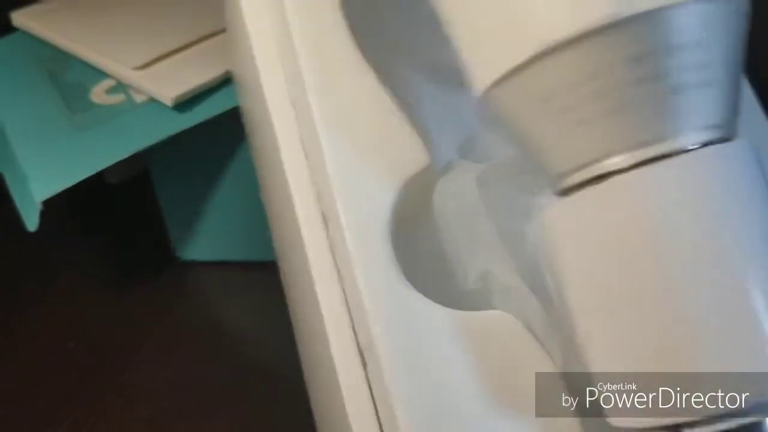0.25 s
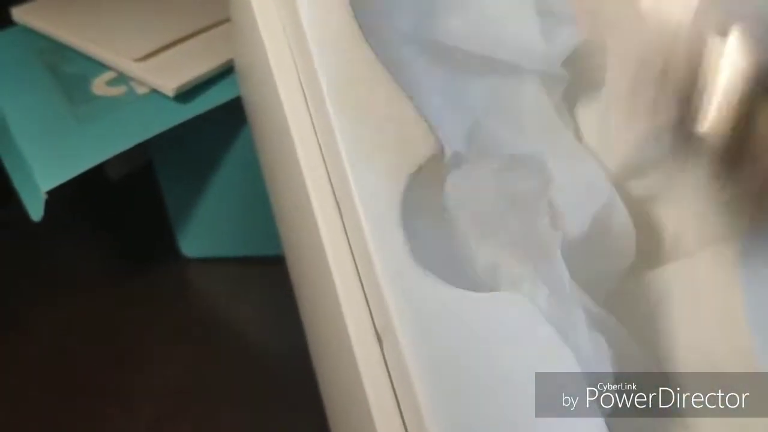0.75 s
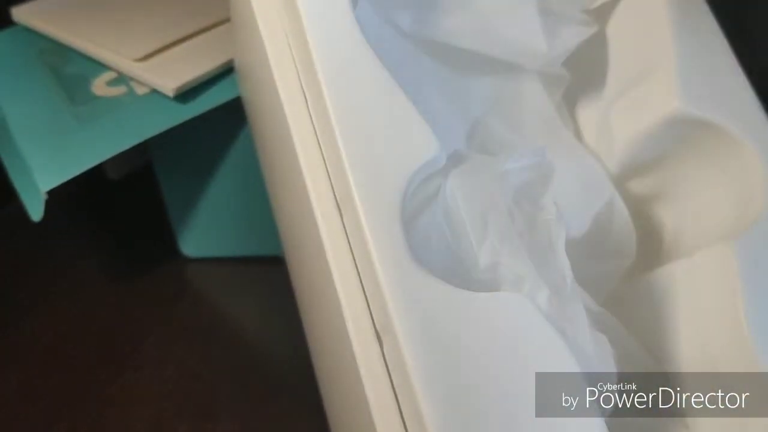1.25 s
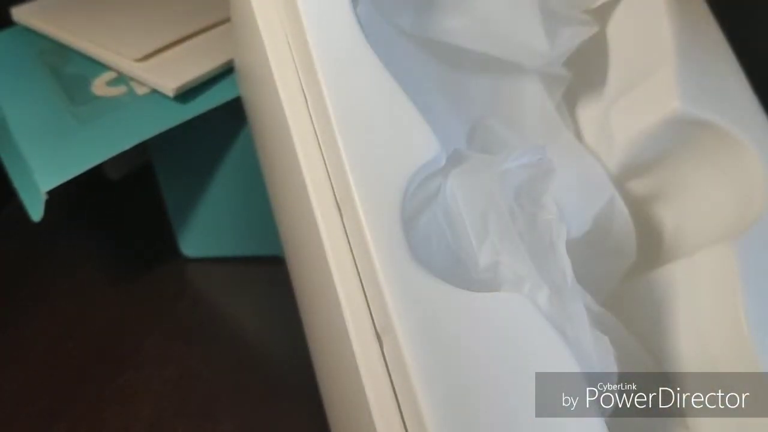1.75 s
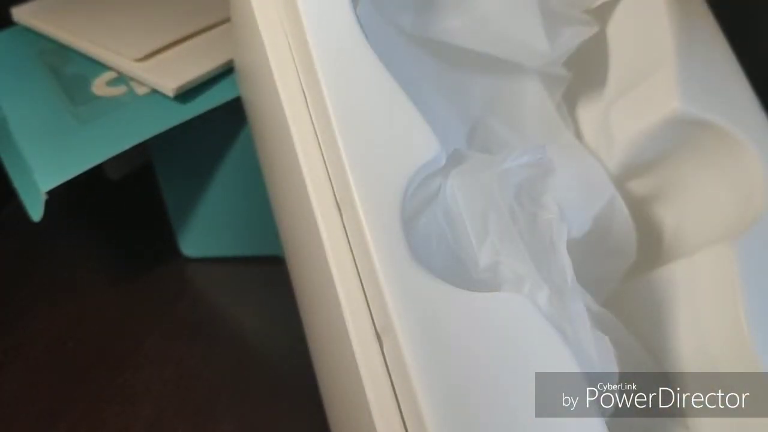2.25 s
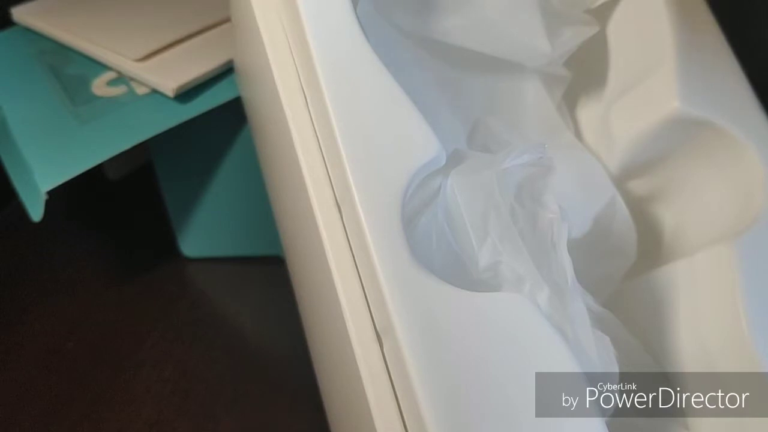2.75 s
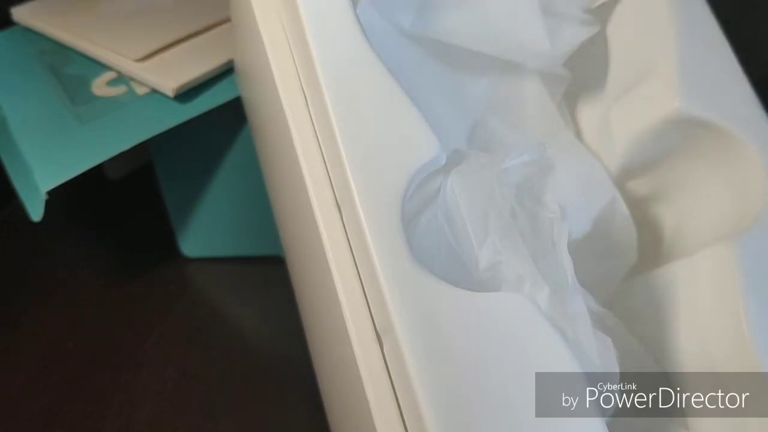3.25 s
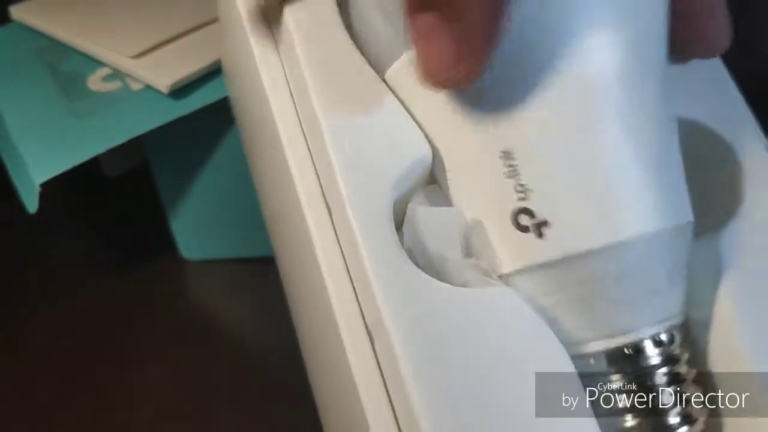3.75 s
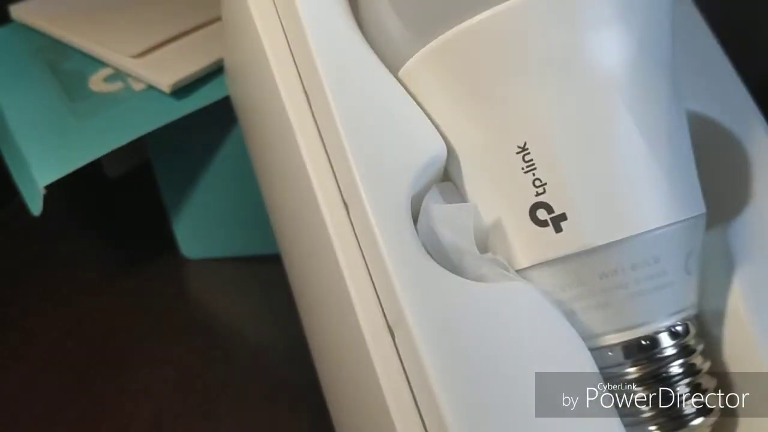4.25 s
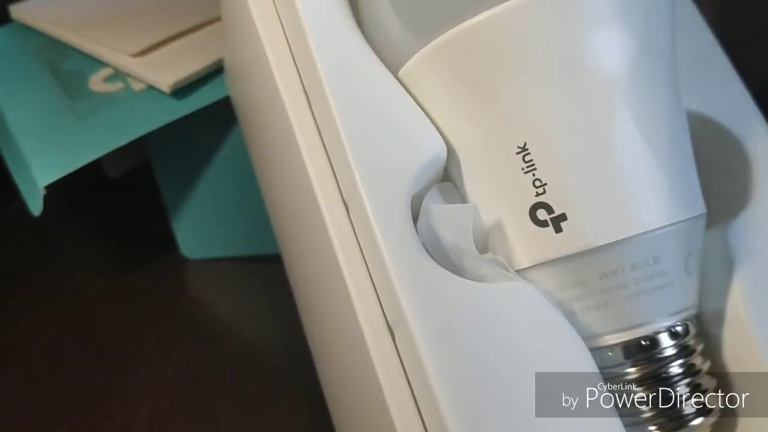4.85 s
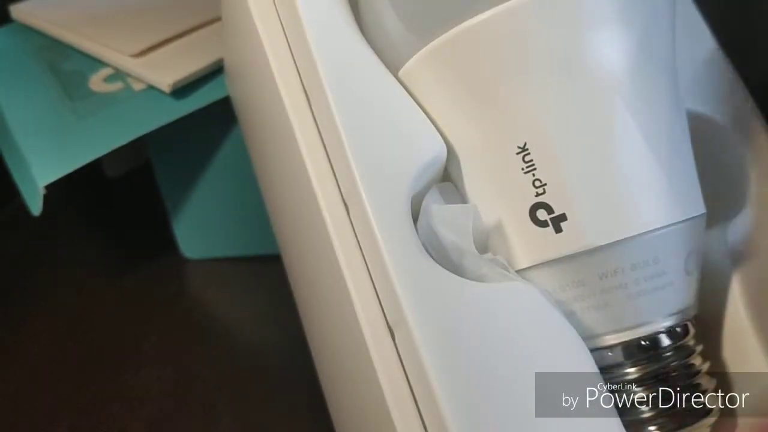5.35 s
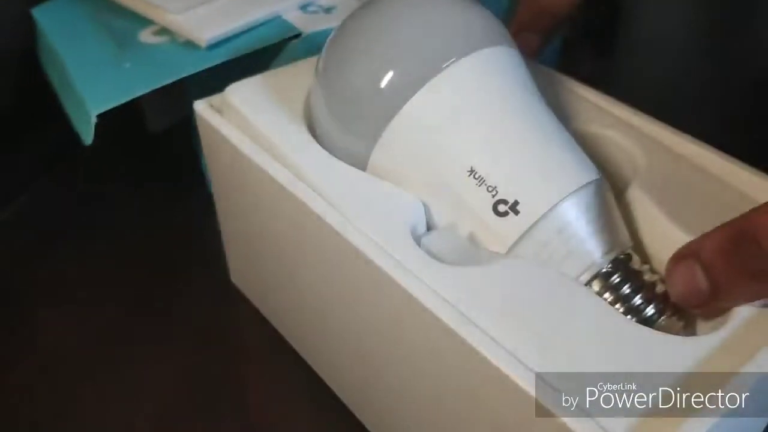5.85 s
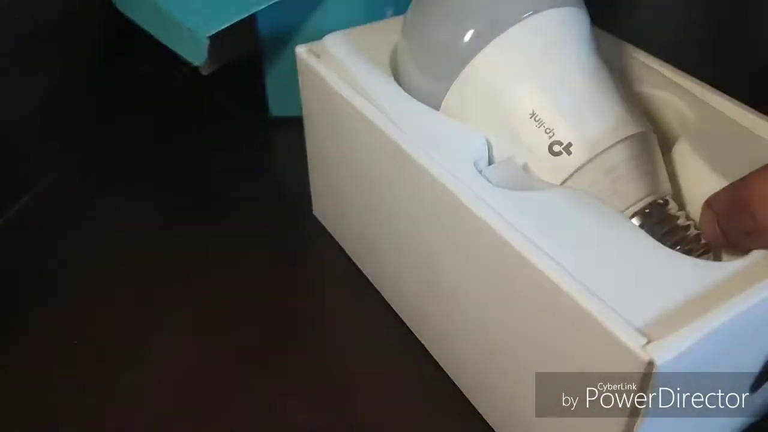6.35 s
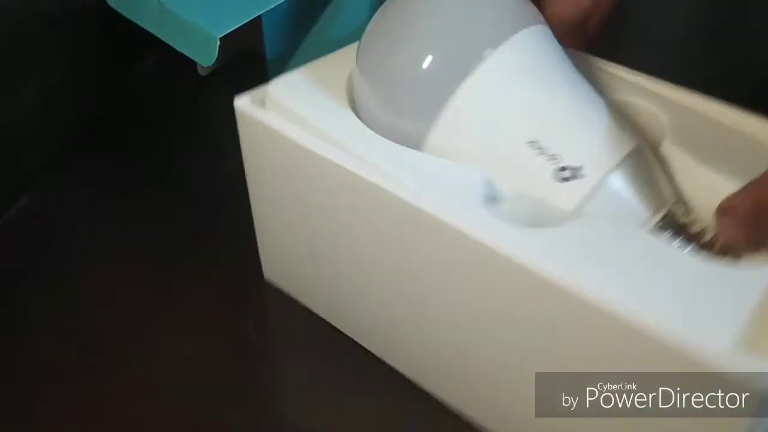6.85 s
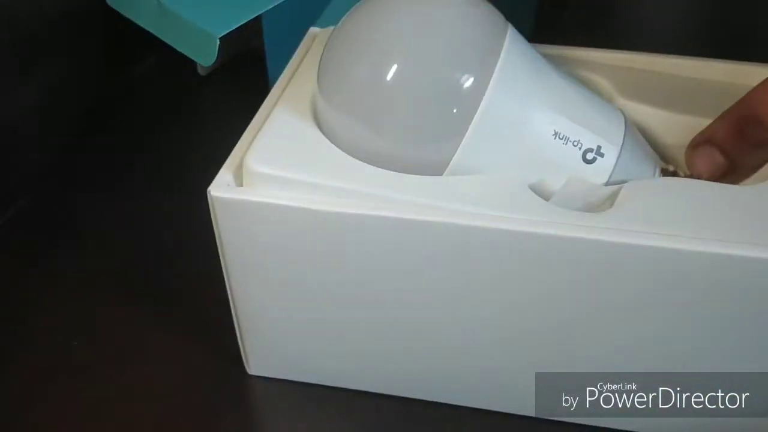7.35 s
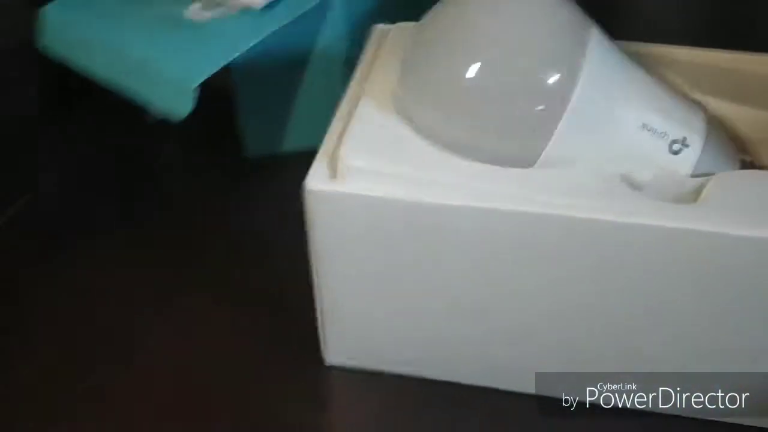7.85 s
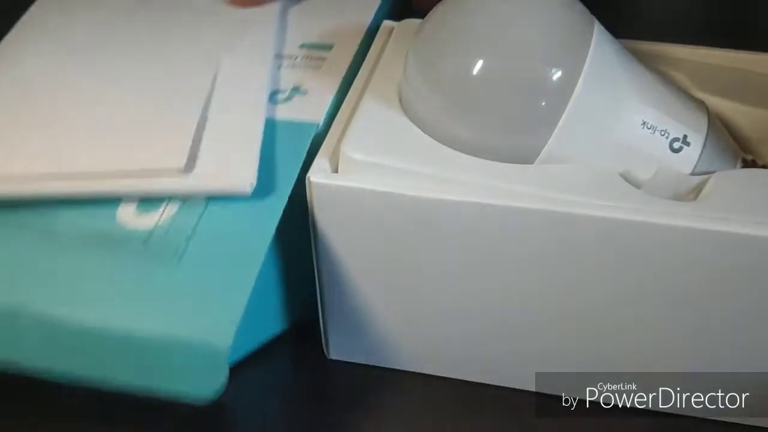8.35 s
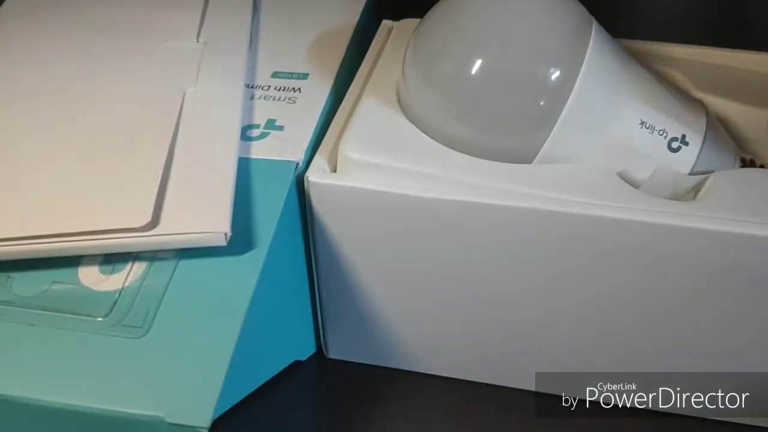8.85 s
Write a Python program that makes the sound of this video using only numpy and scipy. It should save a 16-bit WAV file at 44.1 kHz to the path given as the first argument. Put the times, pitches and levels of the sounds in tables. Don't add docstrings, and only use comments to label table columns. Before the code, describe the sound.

Over a steady fan hum with low buffeting, hard card knocks give way to crisp tissue brushing, one loud clack, then box thump and sliding rubs.

```python
import sys
import numpy as np
from scipy import signal
from scipy.fft import rfft, irfft, next_fast_len
from scipy.io import wavfile

SR = 44100
rng = np.random.default_rng(int(sys.argv[2]) if len(sys.argv) > 2 else 0)


def level_to_linear(level):
    exponent = np.asarray(level, float) / 20
    return 10 ** exponent


def generate_wav(signal):
    frames = np.transpose(np.atleast_2d(signal))
    scaled = np.clip(frames, -1, 1) * 32767
    pcm = np.round(scaled).astype(np.int16)
    wavfile.write(sys.argv[1], SR, pcm)


N = 401298


def at_hz(points, hz):
    table_hz, value = np.array(points).T
    return np.interp(np.log(hz), np.log(table_hz), value)


def bins_hz(size):
    return np.maximum(np.arange(size // 2 + 1) * SR / size, 5)


def rms_one(x):
    return x / np.sqrt(np.mean(x ** 2) + 1e-20)


def drift(rate_hz):
    r = np.exp(-80 * np.pi * rate_hz / SR)
    white = rng.standard_normal(N // 40 + 2002)
    slow = signal.lfilter([1], [1, -2 * r, r * r], white)[2000:]
    return np.interp(np.arange(N) / 40, np.arange(len(slow)), rms_one(slow))


def coloured(x, spectrum):
    size = next_fast_len(N)
    gain = level_to_linear(at_hz(spectrum, bins_hz(size)))
    return irfft(rfft(x, size) * rms_one(gain), size)[..., :N]


def shared(mid, side, alike):
    return np.sqrt(1 + alike) * mid + np.sqrt(1 - alike) * side * [[1], [-1]]


def pair(alike):
    mid, side = rng.standard_normal((2, N))
    return shared(mid, side, alike) / np.sqrt(2)


def filtered(x, order, hz, kind):
    return signal.sosfilt(signal.butter(order, hz, kind, fs=SR, output="sos"), x)


def panned(db):
    return level_to_linear(np.array([db / 2, -db / 2]))


def ring(clicks, hz, t60_s):
    r, w = level_to_linear(-60 / (t60_s * SR)), 2 * np.pi * hz / SR
    return signal.lfilter([0, np.sin(w)], [1, -2 * r * np.cos(w), r * r], clicks + 1e-18)


def swells(s, db, rise_s, fade_s, span_db, power, rest_db):
    t = np.arange(0, N + 32, 32) / SR - s[:, None]
    away = np.where(t < 0, -t / np.abs(rise_s[:, None]), t / np.abs(fade_s[:, None]))
    swell_db = db[:, None] - span_db * np.minimum(away ** power, 9)
    power_sum = level_to_linear(2 * swell_db).sum(0) + level_to_linear(2 * rest_db)
    return np.interp(np.arange(N) / 32, np.arange(t.shape[1]), 10 * np.log10(power_sum))


def late_left(x, samples):
    return np.array([np.roll(x[0], samples), x[1]])


# frequency in Hz, level in dB per Hz.
FAN_SPECTRUM = [(30, 3.5), (100, -4.5), (250, -0.5), (450, -6.5), (730, -11), (1100, -4.5), (1350, -9),
                (1600, -14), (2500, -14.5), (4000, -22), (8000, -32), (16000, -41)]
# frequency in Hz, likeness 0-1.
FAN_LIKENESS = [(60, 0.64), (130, 1), (300, 0.75), (650, 0.54), (1400, 0.017), (16000, .01)]
AIR_DB, HUM_HZ, HUM_WIDTH_HZ, HUM_DB = -48.5, 333, 4.1, -58.5


def room_air():
    size = next_fast_len(N)
    alike = np.clip(at_hz(FAN_LIKENESS, bins_hz(size)), 0, 1)
    mid, side = rfft(rng.standard_normal((2, size)))
    white = irfft(shared(mid, side, alike), size)[:, :N]
    hum = rms_one(ring(rng.standard_normal(N), HUM_HZ, 2.7 / HUM_WIDTH_HZ))
    hum = hum + 1.3 * np.sin(2 * np.pi * HUM_HZ * np.cumsum(1 + .004 * drift(2)) / SR)
    air = level_to_linear(AIR_DB + 0.47 * drift(3.4)) * coloured(white, FAN_SPECTRUM)
    return air + level_to_linear(HUM_DB) * hum * panned(-4.5)[:, None]


# fullest in seconds, level in dB, half length in seconds, left-right in dB.
PORT_GUSTS = [(0.05, -38.5, .3, 6), (0.402, -41, .15, 13), (0.578, -35.5, 0.19, -7), (0.78, -43, 0.28, 13),
              (0.98, -34, .09, 2.5), (1.291, -32.5, 0.19, 10), (1.402, -33.5, 0.11, 13),
              (1.54, -40, .28, -8), (1.96, -40, 0.31, -3), (2.253, -39, .12, 18), (2.34, -33.5, .15, -7.5),
              (2.592, -39, 0.24, 12), (2.73, -43, 0.17, -12), (2.921, -38.5, .15, 19.5),
              (3.07, -32, 0.15, -6.5), (3.527, -40.5, .1, 13), (3.771, -34.5, 0.26, -4),
              (4.06, -40.5, 0.31, -5), (4.47, -40.5, 0.17, 10), (5.6, -40, 0.21, 5), (5.95, -42, 0.33, 1),
              (6.356, -37.5, .15, 11.5), (6.517, -40.5, .3, -3.5), (6.802, -46, 0.48, 7.5),
              (7.55, -35, 0.29, -4.5), (8.015, -46, .33, 0.5), (8.29, -47, .1, 13),
              (8.446, -32.5, .15, -2.5), (8.642, -33.5, 0.21, 3), (8.93, -33.5, 0.45, 11.5)]
GUST_SPAN_DB, GUST_ROUND, LULL_DB = 20, 1.38, -60


def draught():
    s, db, half_s, pan_db = np.transpose(PORT_GUSTS)
    left, right = [swells(s, db + way * pan_db / 2, half_s, half_s, GUST_SPAN_DB, GUST_ROUND, LULL_DB)
                   for way in (1, -1)]
    low = filtered(rng.standard_normal((2, N)), 2, [18, 65], "band")
    high = filtered(rng.standard_normal((2, N)), 2, [60, 150], "band")
    side_db = np.array([left + 4.3 * drift(34.7), right + 2.3 * drift(36)])
    high_db = -8.5 + 0.53 * (side_db + 29.5)
    return level_to_linear(side_db) * (rms_one(low) + level_to_linear(high_db) * rms_one(high))


# start in seconds, peak in dB, coarseness in dB, left-right in dB.
SNAPS_OF_CARD = [(0.2746, -13, -8, 5), (0.2987, -26, -4, 0.5), (0.3075, -23, -8, 5), (0.3195, -32, -2, -2),
                 (0.337, -11.5, -12.5, -10.5), (0.3714, -34, -5, -7), (0.5221, -23, -9, -2),
                 (0.601, -18, -19, -5), (3.7235, -21.5, -14, 3), (3.7514, -24.5, -11, -12),
                 (3.891, -30, -18, 2), (3.9022, 1.5, -24, -5), (5.5997, -35, -6, -8),
                 (5.838, -13, -17, 0.5), (5.847, -5, -10, -10), (5.853, -2.5, -10.5, -3),
                 (8.8548, -38, -12, 6)]
# start in seconds, peak in dB, left-right in dB.
SNAPS_OF_TISSUE = [(1.701, -21, 3), (1.7327, -22, -6), (1.7644, -24, -8), (1.849, -28, -5),
                   (1.8599, -17, 0.5), (2.0287, -29, -3), (2.0785, -16.5, 7), (2.289, -25, 5),
                   (2.3, -11.5, -3), (2.364, -18.5, -8), (2.6893, -26, -5), (2.7495, -9.5, 0),
                   (3.7025, -19, -10), (3.787, -23.5, -13), (3.846, -22, -9), (5.0379, -35, 9),
                   (5.1104, -37, 8), (5.1641, -36, 14), (5.1804, -36, 15), (8.4702, -23, -7),
                   (3.93, -28, -5), (8.522, -30, -5)]
SNAP_T60_S, TISSUE_COARSE_DB = 0.017, -24


def snaps():
    bright, coarse, t = np.zeros((2, N)), np.zeros((2, N)), np.arange(4000) / SR
    tissue = [(s, db, TISSUE_COARSE_DB, pan) for s, db, pan in SNAPS_OF_TISSUE]
    for s, peak_db, coarse_db, pan_db in [*SNAPS_OF_CARD, *tissue]:
        i = round(s * SR)
        rise = np.minimum(t / .0005, 1) * panned(pan_db)[:, None]
        bright[:, i:i + 4000] += rise * level_to_linear(peak_db - 10.5 - 60 * t / SNAP_T60_S)
        coarse[:, i:i + 4000] += rise * level_to_linear(peak_db + coarse_db - 8.0 - 60 * t / (1.23 * SNAP_T60_S))
    top = filtered(bright * pair(0.95), 3, 4600, "high")
    middle = filtered(coarse * pair(0.97), 2, [1500, 4200], "band")
    return top + level_to_linear(15.5) * middle


# start in seconds, peak in dB, loudest ring in Hz, thud in dB, hardness in dB per octave.
TRAY_KNOCKS = [(0.2752, -11.5, 870, -23, 1), (0.2981, -19.5, 1150, -33, 0), (0.308, -21, 1180, -20, -2),
               (0.320, -21, 800, -25, -0.5), (0.337, -6.5, 880, -28, -3), (0.36, -29, 560, -27, -4.0),
               (0.3785, -20, 570, -32, -3), (0.5225, -15, 926, -27, -1), (0.556, -29.5, 696, -26, 0),
               (0.602, -31, 473, -13, -1.5), (0.62, -30.5, 616, -8.5, -0.5), (3.737, -25, 560, -29, 0),
               (3.747, -37, 473, -23, -4.0), (3.777, -24.5, 580, -27, -10), (3.9025, -26, 565, -14, -3),
               (5.599, -41, 428, -3, -17), (5.744, -37, 643, -12, -11), (5.847, -12, 740, -9, 1.5),
               (5.8535, -14, 700, -13, -0.5), (5.859, -18, 720, -15, -9), (5.912, -40, 500, 10, -3)]
# start in seconds, peak in dB, loudest ring in Hz, thud in dB, #
# hardness in dB per octave.
FURTHER_KNOCKS = [
    (0.283, -26, 420, -18, -6),
    (0.313, -24, 1180, -25, -2),
    (0.3405, -21, 560, -28, -3),
    (3.811, -34, 552, -25, -8),
    (3.719, -37, 1030, -30, -4),
    (5.869, -25, 400, -6, -5),
    (5.885, -30, 900, -4, -2),
]
# frequency in Hz, level in dB, t60 in seconds.
TRAY_MODES = [
    (370, -4, 0.03),
    (555, 5.5, 0.05),
    (880, 4, 0.03),
    (1200, 2.5, 0.035),
    (1794, -2, 0.025),
    (2420, -4.5, 0.028),
    (3180, -14, 0.018),
]
# frequency in Hz, level in dB, t60 in seconds.
TABLE_MODES = [
    (115, -8, 0.13),
    (163.8, -7.5, 0.22),
    (228.6, -5, 0.058),
    (308, -3.5, 0.046),
]
FIRM_T60_S, T60_S_PER_DB = 0.010, .0008
CHATTER_DB, CHATTER_T60_S = -34, .08
RADIATES_HZ = 480


def knocks():
    out, push, t = np.zeros((2, N)), np.hanning(12) / -6, np.arange(9000) / SR
    count = len(TRAY_KNOCKS)
    shares = rng.normal(0, 1, (count, 3, len(TRAY_MODES)))
    chatters = rng.standard_normal((count, 2, 9000)) * level_to_linear(CHATTER_DB - 60 * t / CHATTER_T60_S)
    for k, (s, peak_db, hz, thud_db, tilt_db) in enumerate([*TRAY_KNOCKS, *FURTHER_KNOCKS]):
        share, chatter = shares[k % count], chatters[k % count]
        t60_s = FIRM_T60_S - T60_S_PER_DB * peak_db
        contact = .9 * chatter[0] + .35 * chatter + (t == 0)
        click = signal.lfilter(push, [1], contact) * level_to_linear(peak_db)
        sound = level_to_linear(-0.4) * ring(click, hz, .8 * t60_s)
        for (mode_hz, mode_db, mode_t60_s), z in zip(TRAY_MODES, share.T):
            spread_db = 1.5 * z[0] + 2.2 * z[1:, None]
            level = level_to_linear(mode_db - 7.5 + spread_db + tilt_db * np.log2(mode_hz / 600))
            sound += level * ring(click, mode_hz * (1 + 0.015 * z[1]), mode_t60_s * t60_s / 0.04)
        sound = filtered(sound, 2, RADIATES_HZ, "high")
        for m, (mode_hz, mode_db, mode_t60_s) in enumerate(TABLE_MODES):
            sound += (-1) ** m * level_to_linear(mode_db + thud_db + 4.5) * ring(click[0], mode_hz, mode_t60_s)
        i = round(s * SR)
        out[:, i:i + 9000] += sound
    return out


# start
# in seconds, frequency in Hz, peak in dB, t60 in seconds, # left-right in dB.
CONTACT_RINGS = [(0.2752, 1800, -10.5, .022, 0), (0.2752, 2790, -18, .016, 0), (0.2752, 4600, -28, .012, -4),
                 (0.2752, 5960, -24, .04, -4), (0.2752, 7330, -30, .015, 0), (0.3372, 2420, -21, .022, 0),
                 (0.3372, 5290, -30, .012, -4), (0.3372, 6200, -31, .014, -4), (3.9022, 2010, -27, .018, 0),
                 (3.9022, 2520, -23, .012, 0), (3.9022, 3310, -31, .012, 0), (3.9022, 5210, -18, .013, -4),
                 (3.9022, 7050, -20, .014, -4), (3.9022, 8700, -21, .012, 0), (5.848, 1570, -21, .02, 0),
                 (5.848, 2430, -24, .035, 0), (0.573, 6600, -38, .012, -4), (8.474, 5500, -38, .015, -4),
                 (8.474, 6600, -41, .015, -4), (8.468, 3700, -42, .015, 0), (8.52, 560, -40, .03, 0),
                 (8.308, 6600, -43, .025, -4), (3.904, 565, -22, .036, -1), (3.9024, 1400, -28, .015, 0),
                 (5.849, 1300, -20, .035, 0), (5.849, 560, -16, .07, -1), (0.2985, 2300, -28, .02, 0),
                 (0.5228, 1900, -30, .015, 0), (0.5228, 5300, -36, .012, -4)]


def contact_rings():
    out, t = np.zeros((2, N)), np.arange(2500) / SR
    for s, hz, peak_db, t60_s, pan_db in CONTACT_RINGS:
        i = round(s * SR)
        tone = np.sin(2 * np.pi * hz * t) * np.minimum(t / .0004, 1)
        out[:, i:i + 2500] += panned(pan_db)[:, None] * level_to_linear(peak_db - 60 * t / t60_s) * tone
    return out


# fullest in seconds, hiss in dB, rise in seconds, fade in seconds.
CARD_RUBS = [(0.277, -28, 0.0028, 0.017), (0.601, -37.5, 0.068, .07), (0.776, -55, .15, .09),
             (3.66, -43.5, .022, .1), (3.89, -52, .1, .05), (3.913, -39, .015, .15),
             (5.729, -37, .055, 0.13), (5.853, -20.5, 0.015, 0.023), (6.122, -52.5, 0.085, .1),
             (6.366, -42.5, .2, 0.24), (6.47, -46.5, 0.17, 0.058), (6.627, -56.5, .15, 0.12),
             (6.733, -57, .15, .25), (7.0, -42, .09, 0.12), (7.09, -42, .1, .13), (7.2, -54, .1, .09),
             (7.325, -58, .08, .045), (7.625, -58, .35, 0.27), (7.87, -43.5, .03, 0.22),
             (7.94, -41.5, 0.13, 0.37), (8.33, -43, 0.23, .1), (8.46, -49, .15, .1),
             (8.549, -41.5, .1, 0.083)]
# fullest in seconds, hiss in dB, rise in seconds, fade in seconds.
WEIGHT_DRAGS = [
    (0.29, -44.5, .015, 0.21),
    (3.747, -47, 0.077, 0.13),
    (5.87, -39.5, .03, 0.15),
    (7.02, -44, .15, 0.17),
    (7.97, -50, .12, .15),
    (6.31, -50, .05, 0.097),
]
# fullest in seconds, hiss in dB, rise in seconds, fade in seconds.
TISSUE_RUBS = [(1.435, -45, .04, 0.15), (1.601, -41.5, .2, .075), (1.702, -42.5, .02, 0.12),
               (1.858, -34.5, 0.061, 0.12), (2.085, -40, .01, .15), (2.16, -37, 0.11, .05),
               (2.301, -40, .012, .07), (2.38, -44.5, .04, .2), (2.495, -38.5, 0.21, .05),
               (2.68, -44.5, .012, 0.044), (2.752, -37, .005, .03), (2.78, -43.5, .035, .15),
               (2.84, -42.5, 0.13, 0.091), (4.99, -54, .22, .4), (5.17, -59, .2, .2),
               (5.444, -54, 0.19, .3), (8.141, -41, 0.23, .3), (8.862, -51, 0.067, .055)]
# roundness of the swell, coarseness in dB of a faint stroke, its loss in dB per dB of force.
RUB_MATERIALS = [
    (1.32, -1.5, .75),
    (1.4, 0.3, .4),
    (1.33, 3, 0.14),
]
STROKE_SPAN_DB, REST_HISS_DB = 20.5, -67
FAINT_DB, REST_COARSE_DB = -59, 3


def rub_levels():
    hiss, drag = level_to_linear(2 * REST_HISS_DB), level_to_linear(2 * (REST_HISS_DB + REST_COARSE_DB))
    for rows, (power, coarse_db, loss) in zip([TISSUE_RUBS, CARD_RUBS, WEIGHT_DRAGS], RUB_MATERIALS):
        db = swells(*np.transpose(rows), STROKE_SPAN_DB, power, -200)
        hiss = hiss + level_to_linear(2 * db)
        drag = drag + level_to_linear(2 * (db + coarse_db - loss * np.maximum(db - FAINT_DB, 0)))
    return np.sqrt(hiss), np.sqrt(drag)


def patches(white):
    flares = [level_to_linear(3 * drift(9) + 3.5 * drift(40)) for _ in range(6)]
    pitches_hz = np.linspace(4800, 15000, 20) + rng.normal(0, 196, 20)
    total = np.zeros_like(white)
    for k, hz in enumerate(pitches_hz):
        total += (-1) ** k * np.roll(flares[k % 6], k * 30011) * ring(white, hz, 0.0033)
    return rms_one(total)


# frequency in Hz, level in dB per Hz.
HISS_SPECTRUM = [(1500, -41), (3200, -13.5), (4600, -14), (5600, -3.5), (7500, -6.5), (10000, -6),
                 (16000, -10.5)]
# frequency in Hz, level in dB per Hz.
DRAG_SPECTRUM = [(300, -34), (800, -20), (1300, -5), (2000, -3), (2900, 0), (4300, -3), (6000, -12),
                 (9000, -28)]
# frequency in Hz, width in Hz, level in dB.
CARD_MODES = [
    (5250, 500, -10),
    (6370, 140, -5.5),
    (7980, 400, -28),
    (9600, 780, -10),
    (13000, 2100, -6),
]


def rubs():
    hiss, drag = rub_levels()
    fibres = pair(0.073)
    rings = sum(level_to_linear(db + 3.5 * drift(20)) * rms_one(ring(fibres, hz, 2.2 / width_hz))
                for hz, width_hz, db in CARD_MODES)
    mottled = .85 * fibres + .45 * patches(fibres)
    bright = coloured(mottled, HISS_SPECTRUM) + level_to_linear(-10.5) * rings
    grain = level_to_linear(-3.5 + 1.06 * drift(21) + 1.04 * drift(150))
    return grain * (hiss * bright + level_to_linear(3.5) * drag * coloured(pair(0.16), DRAG_SPECTRUM))


# fullest in seconds, half length in seconds, slips in Hz, level in dB,
# sag of pitch at the ends 0-1.
STICK_SLIPS = [
    (1.856, .014, 2550, -30, 0.05),
    (7.04, .085, 1510, -39.5, .3),
    (8.075, .01, 5200, -41.5, 0),
    (8.525, .012, 3650, -45, .03),
    (5.84, .007, 3450, -33, .01),
]
# multiple of the slip rate, level in dB.
SLIP_HARMONICS = [
    [(1, -4), (2, -5), (3, 0), (4, -6), (5, -4)],
    [(1, -3), (2, -5), (3, -14), (4, -13), (5, -15)],
    [(1, 0)],
    [(1, 0)],
    [(1, 0)],
]
SQUEAK_FADE_DB = 21


def squeaks():
    out, wobble, flutter = np.zeros(N), drift(290), drift(90)
    for (s, half_s, hz, level_db, sag), harmonics in zip(STICK_SLIPS, SLIP_HARMONICS):
        on = np.arange(round((s - 2 * half_s) * SR), round((s + 2 * half_s) * SR))
        arch = ((on / SR - s) / half_s) ** 2
        slips_hz = hz * (1 - sag * arch) * (1 + .02 * wobble[on])
        phase = 2 * np.pi * np.cumsum(slips_hz) / SR
        for multiple, db in harmonics:
            order = int(round(multiple))
            waver_db = 5 * np.roll(flutter, 9001 * order)[on]
            gain = level_to_linear(level_db - SQUEAK_FADE_DB * arch + db + waver_db)
            out[on] += gain * np.sin(order * phase + multiple ** 2)
    return out


ROOM_T60_S, WALL_CUT_HZ = 1, 13000


def room(x):
    size = next_fast_len(N + SR)
    w = 2 * np.pi * np.arange(size // 2 + 1) / size
    dull = 1 / (1 + 1j * w * SR / (2 * np.pi * WALL_CUT_HZ))
    combs = []
    for k, lag_s in enumerate(rng.uniform(.008, .03, 12)):
        loop = level_to_linear(-60 * lag_s / ROOM_T60_S) * dull * np.exp(-1j * w * lag_s * SR)
        combs.append(loop / (1 - loop) * (-1) ** (k // 2))
    sides = np.array([sum(combs[::2]), sum(combs[1::2])])
    return irfft(rfft(x, size) * sides, size)[:, :N]


ROOM_DB = -34.5
KNOCK_LAG, RINGS_LAG, RUSTLE_LAG = 9, 5, 18


def scene():
    background = room_air() + draught()
    near = late_left(knocks(), KNOCK_LAG) + late_left(contact_rings(), RINGS_LAG)
    near += late_left(snaps() + rubs() + squeaks(), RUSTLE_LAG)
    return near + level_to_linear(ROOM_DB) * room(near) + background


def band_limit(x):
    return signal.sosfilt(signal.butter(12, 16500, fs=SR, output="sos"), x)


# frequency in Hz, width in Hz, level in dB.
PORT_RESONANCES = [
    [(13600, 5250, 12), (5700, 6300, -2)],
    [(6800, 2380, 10.5), (10840, 5900, -1), (15100, 5800, -15)],
]
CUTOFF_HZ = 15550


def record(dry):
    ports = []
    for x, peaks in zip(dry, PORT_RESONANCES):
        for hz, width_hz, db in peaks:
            w, a, g = 2 * np.pi * hz / SR, np.tan(np.pi * width_hz / SR), level_to_linear(db / 2)
            x = signal.lfilter([1 + a * g, -2 * np.cos(w), 1 - a * g], [1 + a / g, -2 * np.cos(w), 1 - a / g], x)
        ports.append(x)
    rounded = .9 * np.tanh(np.array(ports) / .9)
    mix = signal.sosfilt(signal.ellip(8, .5, 45, CUTOFF_HZ, fs=SR, output="sos"), rounded)
    return band_limit(mix)


dry = scene()
out = record(dry)
generate_wav(out)
```